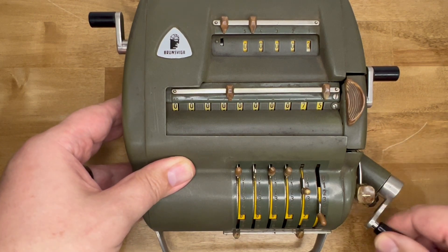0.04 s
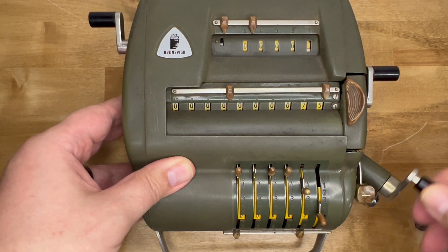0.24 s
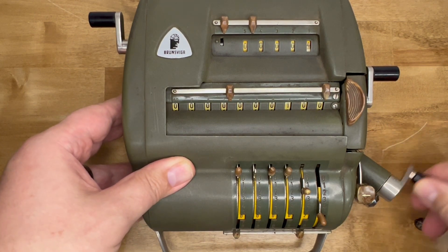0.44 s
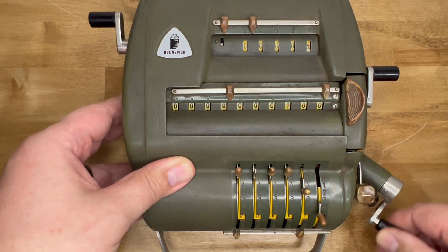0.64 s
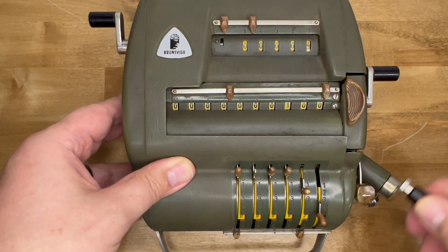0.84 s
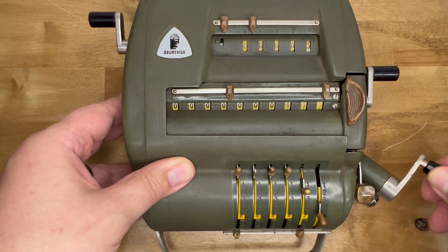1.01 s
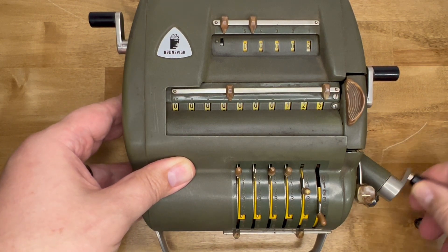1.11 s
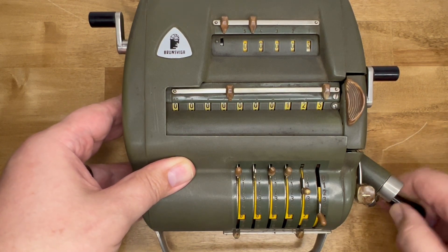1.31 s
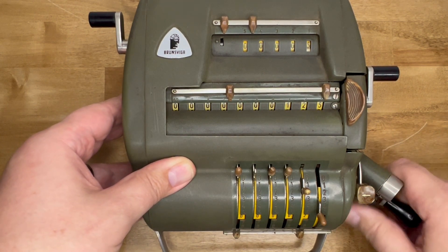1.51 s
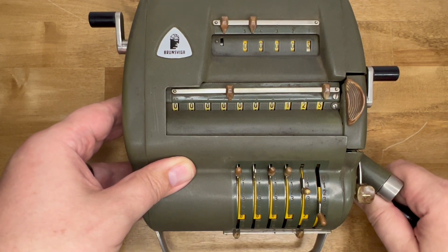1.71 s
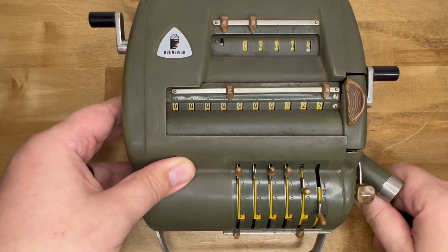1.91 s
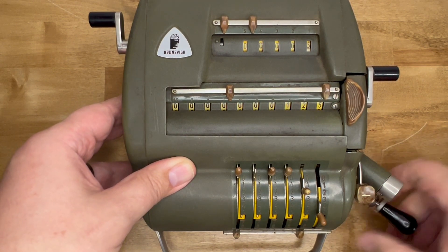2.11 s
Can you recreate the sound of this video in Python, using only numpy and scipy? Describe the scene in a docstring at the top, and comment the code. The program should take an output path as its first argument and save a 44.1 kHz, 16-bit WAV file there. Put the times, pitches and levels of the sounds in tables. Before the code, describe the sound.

Mechanical calculator gears ratchet and clack twice, followed by knocks and a bright metallic latch.

```python
"""A mechanical calculator on a wooden table in a quiet room, heard close up on one microphone.
The crank goes round at about 0.2 s and again at 0.85 s: gears rattle, teeth snap over and ring the
steel wheels, and the case thumps on the table. Between turns the pawl clicks and the loose crank
knocks and ticks. From 1.2 s the hand settles the crank with a short scrape and a few knocks.
At 1.8 s the grip slides home with a bright metallic ring; last, the fingers brush it."""
import sys
import numpy as np
from scipy import signal
from scipy.fft import rfft, irfft
from scipy.io import wavfile

SR = 44100
rng = np.random.default_rng(int(sys.argv[2]) if len(sys.argv) > 2 else 0)


def dump(signal):
    """Clip the signal to [-1, 1] and save it as 16-bit WAV at the path in sys.argv[1]."""
    limited = np.clip(np.atleast_2d(signal).T, -1, 1)
    pcm = np.round(limited * 32767).astype(np.int16)
    wavfile.write(sys.argv[1], SR, pcm)


N = 94815
TIME = np.arange(N) / SR
AGE = TIME[:SR // 2]  # seconds since a blow

# Teeth and pawls snapping over. Each row: start in seconds, level in dB, t60 in seconds.
TOOTH_SNAPS = [(0.2134, -31, 0.15), (0.229, -37, 0.022), (0.247, -36, 0.05), (0.2542, -29.5, 0.071),
               (0.271, -35, 0.12), (.283, -32.5, 0.061), (0.296, -31, 0.095), (.308, -38, 0.053),
               (0.319, -32.5, 0.11), (0.329, -23, 0.013), (0.342, -26.5, 0.028), (.354, -28.5, 0.016),
               (0.3649, -25.5, .05), (0.3747, -17, 0.014), (0.386, -20, 0.028), (0.405, -33, 0.045),
               (0.42, -31.5, 0.025), (0.5376, -32, 0.11), (0.854, -33.5, 0.11), (0.867, -31, 0.022),
               (0.886, -34.5, 0.044), (0.897, -31, 0.033), (0.914, -36.5, 0.12), (0.925, -33, 0.13),
               (0.949, -32.5, 0.027), (0.9598, -26, 0.043), (.973, -29, 0.054), (0.9877, -21.5, 0.028)]
# The meshing gears. Each row: time in seconds, level in dB.
GEAR_LEVEL = [(0, -55), (.11, -66), (.19, -71), (.206, -45), (.29, -41), (.32, -30.5), (.385, -41.5),
              (.43, -38.5), (.45, -45), (.53, -58), (.555, -48.5), (.63, -62), (.83, -69), (.845, -47.5),
              (.91, -45), (.955, -34.5), (.985, -37.5), (1.005, -48.5), (1.10, -66), (1.25, -81)]
# The drum shaking the case. Each row: time in seconds, then base, panel and cover in relative dB.
DRUM_SHAKE = [(0, -48.5, -45.5, -53), (.19, -53, -48, -44.5), (.24, -31, -36, -42.5),
              (.42, -44, -41.5, -32.5), (.48, -49, -57, -49), (.6, -52.5, -47.5, -52), (.76, -50, -50, -49),
              (.84, -75, -43.5, -44.5), (.93, -34.5, -38.5, -40), (1.07, -69, -56, -57.5),
              (1.13, -63, -59.5, -66), (1.45, -63.5, -78, -74), (1.57, -72.5, -101, -88.5),
              (2.15, -71, -78, -79.5)]
# The crank in its bearing and catch. Each row: start in seconds, then cover, panel and clack in dB.
CRANK_KNOCKS = [(.004, -42, -55.5, -71), (.216, -38, -37, -68), (.364, -34.5, -46, -33),
                (.411, -38.5, -35, -30.5), (.477, -39, -47, -38.5), (.5385, -36.5, -43.5, -35),
                (.613, -39.5, -45.5, -66), (.857, -33.5, -39, -40), (.888, -37.5, -37.5, -46),
                (1.034, -47.5, -64, -53), (1.206, -44.5, -80, -52), (1.397, -37, -46.5, -44.5),
                (1.593, -45, -52.5, -45.5), (1.653, -47, -52, -57), (1.767, -76, -49, -63),
                (2.005, -75, -49, -60.5)]
# The crank scuffing its catch. Each row: start in seconds, level in dB, hold in seconds.
CATCH_SCUFFS = [(0.584, -47.5, 0.054), (1.387, -48.5, 0.0062), (1.64, -53, 0.032), (1.757, -60, 0.023)]
# Case on table, shaft in bearing, pawl on ratchet. Each row: time in seconds, level in dB.
TABLE_THUMPS = [(.069, -42.5), (0.219, -43.5), (0.262, -31), (0.328, -41.5), (0.388, -37), (0.69, -44),
                (0.717, -46), (0.868, -37.5), (0.905, -32), (.945, -34.5), (0.994, -40), (1.03, -42),
                (1.058, -49)]
SHAFT_RUBS = [(0.113, -50), (0.130, -46), (0.16, -37), (0.170, -36.5), (0.7835, -38.5), (0.796, -35)]
PAWL_DROPS = [(.001, -53.5), (0.016, -50), (.040, -66), (.0635, -48.5), (0.1178, -48.5), (0.567, -53),
              (.648, -54), (0.662, -53), (.708, -50.5), (0.758, -59)]
# Small loose parts. Each row: start in seconds, level in dB, centre in Hz.
LOOSE_TICKS = [(.004, -52, 4850), (0.05, -46, 3120), (0.065, -58, 6900), (.163, -57.5, 3100),
               (.463, -39, 2950), (.412, -31.5, 4580), (0.51, -49.5, 9100), (1.141, -64, 2600),
               (0.661, -48, 4500), (0.693, -45.5, 3140), (1.025, -40, 3220), (1.385, -49, 9380),
               (1.386, -50, 5150), (1.664, -62.5, 8980), (1.747, -63.5, 9000), (1.763, -56, 5250)]
# A small spring singing. Each row: start in seconds, level in dB, seconds until damped.
SPRING_RINGS = [(0.337, -35, 0.012), (0.411, -34, 0.066), (1.031, -54, .025)]

# Modes of the steel wheels, case on the table, side panel, top cover, crank arm, and the grip's
# sleeve and steel pin. Each row: frequency in Hz, relative level in dB.
WHEEL_MODES = [(3094, -3), (3736, -4), (4330, -5), (4568, -2), (6300, -7), (7705, 0), (7798, 1), (8048, -2),
               (8324, 0), (8369, 0), (11036, 0), (12700, -6)]
BASE_MODES = [(110, -14), (140, -12), (186, -8), (202, 2), (234, -9), (247, -8), (262, -1), (371, -11)]
PANEL_MODES = [(465, -8), (540, -3.5), (567, 5.5), (584, -10.5), (611, 5), (635, -4.5), (790, -9),
               (905, -9.5)]
COVER_MODES = [(1200, -2), (1218, -5), (1257, -4), (1286, -4), (1312, -2), (1348, -4), (1379, 0),
               (1397, -3)]
ARM_MODES = [(1787, 2.5), (1986, -5), (2143, 6), (2417, 0.5), (3117, 4), (4194, -4)]
SLEEVE_MODES = [(6480, -7), (8330, -8), (8530, 1), (8700, -2), (8975, -2), (9080, -5), (9717, -8)]
PIN_MODES = [(2003, -2), (3386, -2), (3801, 0), (4393, -1), (5200, -5), (6440, -1), (8527, 2), (8969, -2)]

# Each noise's spectrum at the microphone. Each row: frequency in Hz, relative level in dB.
TOOTH_SPECTRUM = [(150, -40), (600, 3), (1000, -20.5), (2400, -9.5), (4300, 4.5), (5400, -2.5), (7800, 1),
                  (12500, -3), (16000, -6.5)]
GEAR_SPECTRUM = [(30, -33.5), (243, 1.5), (444, -27.5), (556, -0.5), (751, -11), (1340, -11), (2260, -15.5),
                 (4460, -12), (5310, -18), (12500, -26), (16000, -35.5)]
CLACK_SPECTRUM = [(100, -27), (900, -2.5), (1400, 1), (2750, -4), (4400, -6.5), (5700, -12.5),
                  (7000, -33.5), (16000, -44.5)]
SCRAPE_SPECTRUM = [(60, -65), (182, -9.5), (404, -17), (615, 1.5), (718, -14.5), (1050, -12), (1340, 1),
                   (1530, -12), (2900, -20), (7870, -18.5), (16000, -35)]
SCUFF_SPECTRUM = [(420, -6), (600, 9.5), (850, -15), (1330, 15), (1700, -20.5), (2400, -5), (4300, -3.5),
                  (7000, -20), (16000, -32)]
LATCH_SPECTRUM = [(150, -23), (1300, -8.5), (2500, -3.5), (4500, -1), (7500, -10.5), (9300, 3.5),
                  (11000, -5), (16000, -15)]
SLIDE_SPECTRUM = [(60, -54), (203, 3.5), (283, -23), (361, -7), (500, -14.5), (601, -9), (751, -16.5),
                  (1310, -13), (2490, -20.5), (3870, -13), (8790, -24), (16000, -56)]
BRUSH_SPECTRUM = [(500, 1.5), (5000, -15), (8000, -11), (14000, -25)]
PAWL_SPECTRUM = [(1500, -9), (4800, -3.5), (12600, 3.5), (16000, -4.5)]
ROOM_SPECTRUM = [(25, -15), (230, -6), (1300, -9.5), (3000, -22.5), (8000, -28), (16000, -46)]


def amp(db):
    """Decibels to gain."""
    return 10 ** (np.asarray(db) / 20)


def unit(x):
    """Scales to rms 1."""
    return x / np.sqrt(np.mean(x ** 2) + 1e-20)


def add(mix, start, sound):
    """Mixes a sound in, start seconds along."""
    part = mix[max(round(start * SR), 0):][:len(sound)]
    part += sound[:len(part)]


def level(curve, column=1):
    """Gain over time from one dB column of a curve."""
    columns = np.transpose(curve)
    return amp(np.interp(TIME, columns[0], columns[column]))


def tint(x, spectrum):
    """Filters a signal by a spectrum, at rms 1."""
    hz, db = np.transpose(spectrum)
    f = np.fft.rfftfreq(len(x), 1 / SR)
    gain = amp(np.interp(np.log(f + 1), np.log(hz + 1), db))
    return unit(irfft(rfft(x) * gain, len(x)))


def noise(spectrum, size=N):
    """Coloured noise at rms 1."""
    return tint(rng.standard_normal(size), spectrum)


def varied(spectrum, spread_db):
    """Adds chance peaks and dips, as each contact lands on a different spot."""
    hz, db = np.transpose(spectrum)
    f = np.geomspace(100, SR / 2, num=110)
    smooth_db = np.interp(np.log(f), np.log(hz), db)
    return np.c_[f, smooth_db + spread_db * rng.standard_normal(len(f))]


def resonant_noise(modes, width_hz):
    """Random shaking heard through a set of resonances, at rms 1."""
    f = np.fft.rfftfreq(N, 1 / SR)
    power = sum(amp(db) ** 2 / (1 + ((f - hz) / width_hz) ** 2) ** 2 for hz, db in modes)
    phases = np.exp(2j * np.pi * rng.random(len(f)))
    return unit(irfft(np.sqrt(power) * phases, N))


def blow(rise_s, t60, tail_db, tail_t60):
    """Envelope of a blow: quick rise, fast fall, and a weak tail from case and room."""
    fall = np.hypot(amp(-60 * AGE / t60), amp(tail_db - 60 * AGE / tail_t60))
    env = (1 - np.exp(-AGE / rise_s)) * fall
    return env / env.max()


def stroke(start, rise_s, hold_s, t60):
    """Envelope of a sliding contact: rise, hold, die away."""
    t = np.maximum(TIME - start, 0)
    return np.minimum(t / rise_s, 1) * amp(-60 * np.maximum(t - rise_s - hold_s, 0) / t60)


def ring(modes, env):
    """A part's modes under an envelope; every blow lands a little differently."""
    tones = sum(amp(db) * np.sin(2 * np.pi * (hz * AGE + rng.random())) for hz, db in modes)
    return unit(env * tones) * np.sqrt(np.mean(env ** 2))


def crack(spectrum, env):
    """The dense modes of small steel parts, as a burst of noise."""
    return env * noise(spectrum, len(env))


def grains(per_s, spread_db, t60):
    """A stream of tiny random impacts."""
    hits = (rng.random(N) < per_s / SR) * amp(spread_db * np.minimum(rng.exponential(1, N), 4))
    power = signal.fftconvolve(hits ** 2, amp(-120 * AGE / t60))[:N]
    return unit(np.sqrt(abs(power)) * rng.standard_normal(N))


def gears():
    """Up front, the gear train rattles while single teeth snap over and ring the steel wheels."""
    rattle = tint(grains(per_s=1800, spread_db=2.5, t60=0.014), GEAR_SPECTRUM)
    wheels = amp(-19) * resonant_noise(WHEEL_MODES, width_hz=20)
    out = level(GEAR_LEVEL) * (rattle + wheels)
    wheel_env = blow(rise_s=0.00028, t60=0.045, tail_db=-22.5, tail_t60=0.21)
    for start, db, t60 in TOOTH_SNAPS:
        snap_env = blow(rise_s=0.000073, t60=t60, tail_db=-22, tail_t60=0.19)
        add(out, start, amp(db) * crack(varied(TOOTH_SPECTRUM, spread_db=1.5), snap_env))
        add(out, start, amp(db - 6.5) * ring(WHEEL_MODES, wheel_env))
    return out


def case():
    """The case hums with the turning drum and thumps on the table."""
    out = amp(-3.5) * level(DRUM_SHAKE, column=1) * resonant_noise(BASE_MODES, width_hz=5.2)
    out += amp(-9.5) * level(DRUM_SHAKE, column=2) * resonant_noise(PANEL_MODES, width_hz=15)
    out += amp(-3.5) * level(DRUM_SHAKE, column=3) * resonant_noise(COVER_MODES, width_hz=20)
    thump_env = blow(rise_s=0.017, t60=0.13, tail_db=-19, tail_t60=0.24)
    for start, db in TABLE_THUMPS:
        add(out, start, amp(db) * ring(BASE_MODES, thump_env))
    return out


def crank():
    """Each knock is a clack, the ring of arm and cover, and the slower ring of the side panel."""
    out = np.zeros(N)
    cover_env = blow(rise_s=0.0017, t60=0.058, tail_db=-22, tail_t60=0.43)
    panel_env = blow(rise_s=0.039, t60=0.073, tail_db=-15.5, tail_t60=0.18)
    clack_env = blow(rise_s=0.00067, t60=0.044, tail_db=-20.5, tail_t60=0.3)
    arm_env = blow(rise_s=0.0032, t60=0.042, tail_db=-15.5, tail_t60=0.18)
    for start, cover_db, panel_db, clack_db in CRANK_KNOCKS:
        add(out, start, amp(cover_db) * ring(COVER_MODES, cover_env))
        add(out, start, amp(panel_db) * ring(PANEL_MODES, panel_env))
        add(out, start, amp(clack_db) * crack(CLACK_SPECTRUM, clack_env))
        add(out, start, amp(clack_db - 5.5) * ring(ARM_MODES, arm_env))
    return out


def grip_scrape():
    """The grip gives one gritty scrape, and the crank scuffs softly against its catch."""
    grit = tint(grains(per_s=7100, spread_db=3, t60=0.013), SCRAPE_SPECTRUM)
    out = amp(-40.5) * stroke(start=1.229, rise_s=0.026, hold_s=0.02, t60=0.21) * grit
    for start, db, hold_s in CATCH_SCUFFS:
        out += amp(db) * stroke(start, rise_s=0.0041, hold_s=hold_s, t60=0.13) * noise(SCUFF_SPECTRUM)
    return out


def grip_slide(start=1.802):
    """The grip slides home and latches, ringing the cover, its sleeve and its pin."""
    latch = crack(LATCH_SPECTRUM, blow(rise_s=0.0063, t60=0.25, tail_db=-30, tail_t60=0.29))
    friction = noise(SLIDE_SPECTRUM)
    cover = resonant_noise(COVER_MODES, width_hz=20)
    sleeve = resonant_noise(SLEEVE_MODES, width_hz=75)
    pin = resonant_noise(PIN_MODES, width_hz=13)
    out = amp(-39) * stroke(start, rise_s=0.035, hold_s=0.0049, t60=0.43) * friction
    out += amp(-44) * stroke(start, rise_s=0.032, hold_s=0.025, t60=0.23) * cover
    out += amp(-41.5) * stroke(start, rise_s=0.0084, hold_s=0.033, t60=0.34) * sleeve
    out += amp(-45.5) * stroke(start, rise_s=0.02, hold_s=0.012, t60=0.44) * pin
    add(out, start, amp(-38) * latch)
    return out


def spring(hz=10586, t60=0.26):
    """A thin, unsteady high ring that fades until the spring is damped again."""
    out = np.zeros(N)
    tone = np.sin(2 * np.pi * hz * TIME) + 0.55 * resonant_noise([(hz, 0)], width_hz=90)
    for start, db, hold_s in SPRING_RINGS:
        fade = amp(db - 60 * np.maximum(TIME - start, 0) / t60)
        out += tone * fade * stroke(start, rise_s=0.0013, hold_s=hold_s, t60=0.013)
    return out


def shaft(lead_s=0.02, width_s=0.0045):
    """Each rub in the bearing swells and fades in the modes of the cover, with a little grit."""
    out = np.zeros(N)
    swell = np.exp(-((AGE - lead_s) / width_s) ** 2)
    for peak_s, db in SHAFT_RUBS:
        rub = ring(COVER_MODES, swell) + amp(-25) * crack(CLACK_SPECTRUM, swell)
        add(out, peak_s - lead_s, amp(db) * rub)
    return out


def loose_parts(width_octaves=0.24, skirt_db=-32):
    """Loose parts tick, each with its own uneven resonances around one pitch."""
    out = np.zeros(N)
    f = np.geomspace(300, SR / 2, num=140)
    env = blow(rise_s=0.0013, t60=0.053, tail_db=-20, tail_t60=0.2)
    for start, db, hz in LOOSE_TICKS:
        hump_db = np.maximum(-6 * (np.log2(f / hz) / width_octaves) ** 2, skirt_db)
        add(out, start, amp(db) * crack(varied(np.c_[f, hump_db], spread_db=5), env))
    return out


def ratchet():
    """The pawl drops over the ratchet with faint, dry, bright clicks."""
    out = np.zeros(N)
    env = blow(rise_s=0.0008, t60=0.028, tail_db=-24, tail_t60=0.15)
    for start, db in PAWL_DROPS:
        add(out, start, amp(db) * crack(varied(PAWL_SPECTRUM, spread_db=7), env))
    return out


def room_tone():
    """The faint, steady noise of the room behind the machine."""
    return amp(-75.5) * noise(ROOM_SPECTRUM)


def scene():
    """The machine close up over the room tone, in mono."""
    machine = gears() + case() + crank() + grip_scrape() + grip_slide()
    small_parts = spring() + shaft() + loose_parts() + ratchet()
    fingers = amp(-61) * stroke(start=2.06, rise_s=0.035, hold_s=0.0066, t60=0.055) * noise(BRUSH_SPECTRUM)
    return (machine + small_parts + fingers + room_tone())[None]


def record(dry):
    """The recorder cuts the microphone's treble above 16.1 kHz."""
    lowpass = signal.firwin(511, 16100, window=("kaiser", 9), fs=SR)
    return signal.oaconvolve(dry, lowpass[None], "same")


dry = scene()
out = record(dry)
dump(out)
```